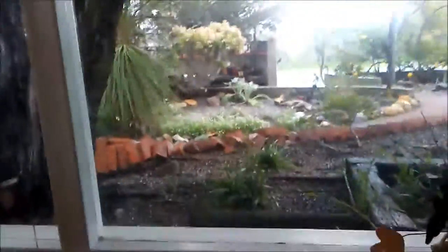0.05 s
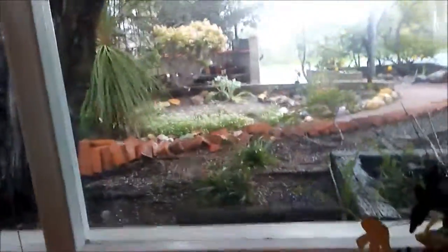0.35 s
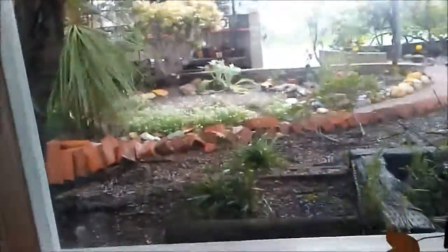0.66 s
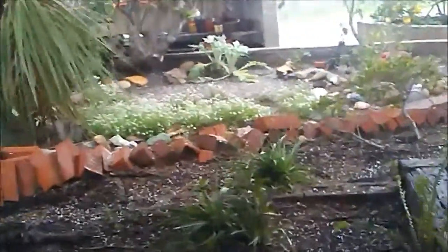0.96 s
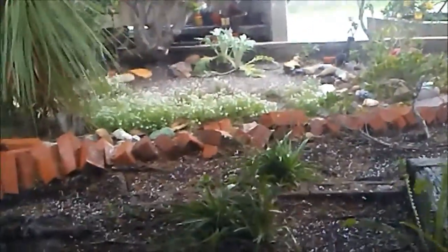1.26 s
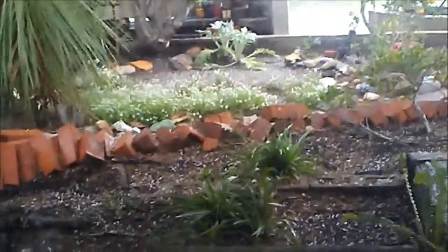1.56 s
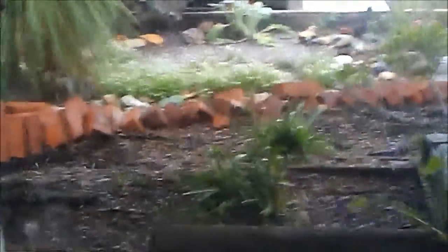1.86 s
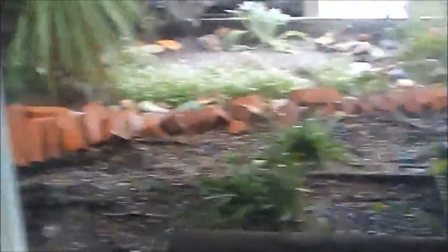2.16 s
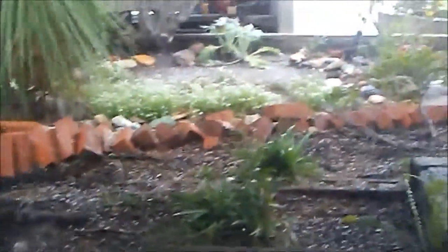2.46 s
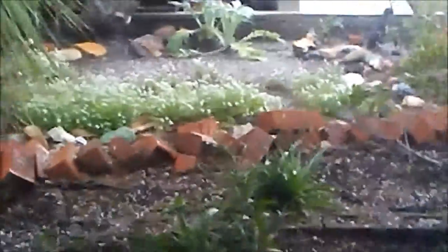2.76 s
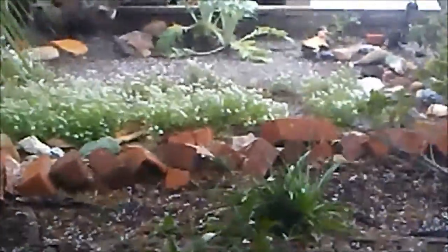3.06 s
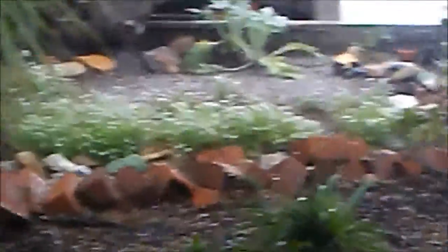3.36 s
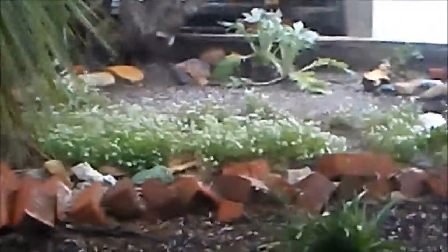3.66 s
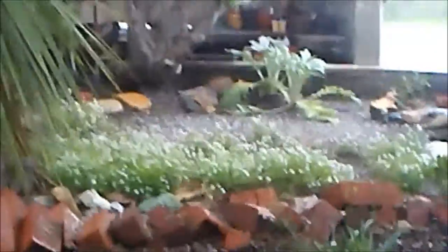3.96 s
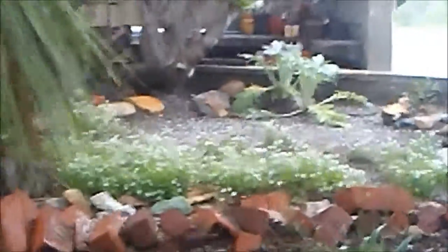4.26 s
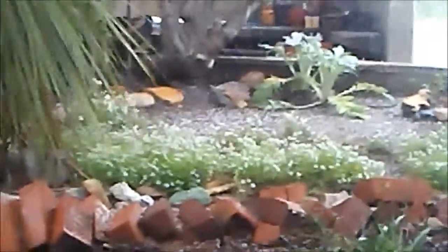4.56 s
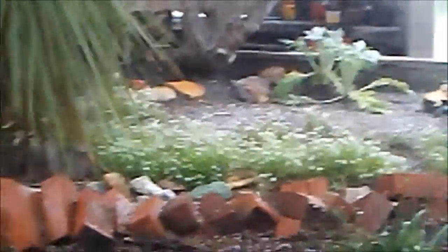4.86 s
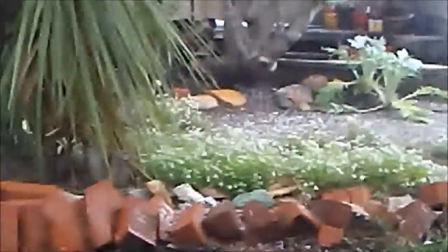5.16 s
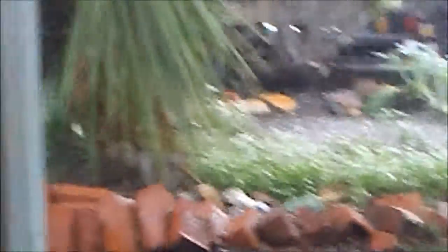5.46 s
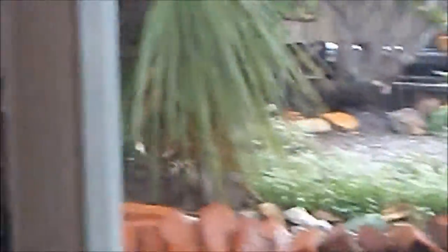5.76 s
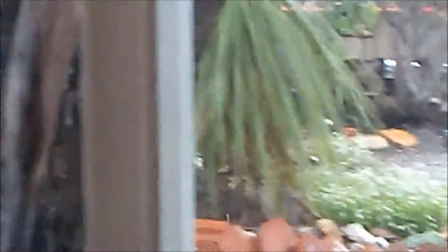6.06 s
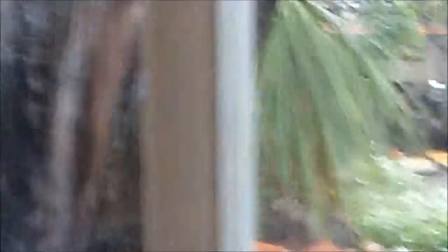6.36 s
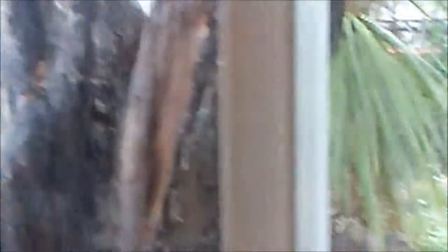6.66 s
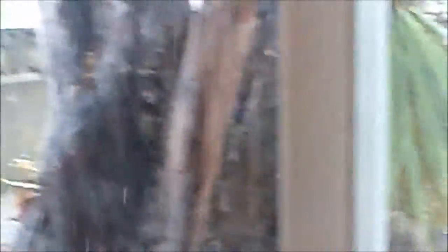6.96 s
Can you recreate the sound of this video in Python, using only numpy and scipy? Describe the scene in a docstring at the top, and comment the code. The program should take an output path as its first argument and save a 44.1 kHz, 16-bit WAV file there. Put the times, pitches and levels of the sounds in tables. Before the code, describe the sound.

A dense, crisp crackle of tiny ice pellets fills a yard throughout, swelling and easing irregularly. Close pellets snap on hard ground and bounce among loose stones, while others tap on leaves or briefly rattle a board. Farther landings merge into faint pattering and low drumming. The sound is bright and close, and gets a little fuller as the microphone turns from the open yard toward a door post.

```python
"""Ice pellets fall in a yard, heard from a doorway. The nearest crack on landing and skitter away,
and large ones rattle a leaf, board or stone. Close by, countless grains tick on hard ground, crunch
into gravel and patter on leaves, in uneven flurries over the low wash of the farther fall.
The microphone turns from the open yard toward the door post; it rings near 11 kHz and just overloads."""
import sys
import numpy as np
from scipy import signal
from scipy.fft import rfft, irfft
from scipy.io import wavfile

SR = 44100
rng = np.random.default_rng(int(sys.argv[2]) if len(sys.argv) > 2 else 0)


def master(y):
    """Save y as 16-bit WAV."""
    cut = np.clip(np.atleast_2d(y).T, -1, 1)
    pcm = np.round(cut * 32767)  # scale
    wavfile.write(sys.argv[1], SR, pcm.astype(np.int16))


N = 313639
TIME = np.arange(N) / SR
BINS = np.fft.rfftfreq(4096, 1 / SR)

# how far the microphone is turned from the open yard toward the door post: (t/s, share 0-1)
MIC_TURN = [(0, 0.3), (.25, 0.6), (.45, 0), (4.1, 0.3), (4.6, 0.48), (5.6, 0.97), (7.11, 0.93)]
# colour of a pellet cracking close to the microphone: (f/Hz, level/dB)
CRACK_COLOUR = [(2000, -68), (6000, -9.5), (8700, -13), (10000, -8.5), (11300, 1), (12200, 1.5),
                (14000, 0.5), (15800, -4.5)]
# colour of a landing in gravel: (f/Hz, level/dB)
GRAVEL_COLOUR = [(500, -20), (1500, -6.5), (2500, -4), (3200, -5.5), (3900, 0), (4700, 3), (5300, -3.5),
                 (5900, -1.5), (6500, -4.5), (7050, -2), (7700, -6.5), (8700, -13), (12000, 12),
                 (16000, -44)]


def gain_of(db):
    """Decibels to amplitude."""
    return 10 ** (np.asarray(db) / 20)


def unit_rms(x):
    """Scales to an rms of one."""
    return x / np.sqrt(np.mean(x ** 2) + 1e-20)


def curve(rows, column=1):
    """One column of a time table, at every sample."""
    rows = np.array(rows)
    return np.interp(TIME, rows[:, 0], rows[:, column])


def spectrum(points):
    """A colour table, in dB at every filter bin."""
    hz, db = np.transpose(points)
    return np.interp(np.log(BINS + 1), np.log(hz), db)


def bump(hz, width_hz, db):
    """One resonance, in dB at every filter bin."""
    return db / (1 + (2 * (BINS - hz) / width_hz) ** 2)


def colour(x, db):
    """Minimum-phase filter, so that clicks keep their sharp fronts."""
    log_gain = np.log(gain_of(np.r_[db, db[-2:0:-1]]))
    impulse = np.fft.ifft(np.exp(np.conj(signal.hilbert(log_gain)))).real
    return signal.oaconvolve(x, impulse)[:len(x)]


def add(mix, start_s, sound):
    """Mixes a sound in at a time."""
    part = mix[max(round(start_s * SR), 0):][:len(sound)]
    part += sound[:len(part)]


def ring(x, hz, width_hz):
    """A damped resonance; the result has energy one."""
    pole = np.exp((2j * hz - width_hz) * np.pi / SR)
    rung = signal.lfilter([1], [1, -pole], x).real
    return rung / (np.linalg.norm(rung) + 1e-12)


def burst(t60, density=0.91, rise_s=0):
    """A dying cluster of tiny contacts, of energy one."""
    t = TIME[1:16001]
    envelope = gain_of(-60 * t / t60) * (1 - np.exp(-t / (rise_s + 1 / SR)))
    contacts = rng.standard_normal(len(t)) * (rng.random(len(t)) < density) * envelope
    return contacts[:int(t60 * SR) + 8] / (np.linalg.norm(contacts) + 1e-12)


def shower(per_s, spread_db, band_hz, width_hz, tail_db, tail_t60, spots=56):
    """Pellets land at random on many spots, each with its own pitch and trail of bounces and echoes."""
    hits = gain_of(spread_db * np.minimum(rng.exponential(1, N), 3.5)) * rng.choice([-1, 1], N)
    hits *= rng.random(N) < per_s / SR
    spot = rng.integers(0, spots, N)
    out = np.zeros(N)
    for k, hz in enumerate(np.linspace(*band_hz, spots)):
        landing = gain_of(tail_db) * burst(tail_t60, density=0.15)
        landing[0] += 1  # the first contact
        out += signal.oaconvolve(hits * (spot == k), ring(landing, hz, width_hz))[:N]
    return out


def fall_db(surface, clump_db, clump_hz, attack_s=0.014, sag_db_per_s=7.5, release_db_per_s=129):
    """Strength of the fall on one surface: flurries start fast, sag and die; pellets clump by chance."""
    # the steady fall between flurries: (t/s, hard ground level/dB, gravel level/dB, leaves level/dB)
    steady_fall = [(0, -10, -22.5, -26), (.55, -25.5, -27.5, -28.5), (.8, -25, -27, -24),
                   (1.04, -29, -27, -29), (1.5, -24, -23.5, -24.5), (1.92, -28.5, -26, -26.5),
                   (2.55, -27, -25.5, -27), (3.4, -26.5, -25.5, -32.5), (4.02, -25, -30.5, -34),
                   (4.42, -24, -32, -37), (4.62, -16, -22.5, -25), (5.3, -17, -23, -29),
                   (5.65, -17, -29, -31.5), (5.85, -16, -21, -27), (6.25, -15, -22, -32),
                   (6.75, -21.5, -25, -25), (7.02, -16, -27, -37)]
    # handfuls that land together: (t/s, length/s, hard ground level/dB, gravel level/dB, leaves level/dB)
    flurries = [(0, 0.23, -19, -33, -27), (0.355, 0.046, -22, -20, -21.5), (0.624, 0.2, -19, -25, -40),
                (.9, 0.048, -18.5, -23, -27), (1.114, 0.1, -22.5, -22.5, -22),
                (1.288, 0.11, -18, -22.5, -23), (1.484, 0.18, -22, -27, -26.5),
                (1.66, 0.058, -24, -24.5, -20), (1.813, 0.026, -26, -21.5, -26),
                (1.944, 0.079, -14, -17, -22.5), (2.111, .25, -16, -20.5, -22),
                (2.663, 0.071, -22.5, -24.5, -23.5), (2.768, 0.09, -18, -18, -22),
                (2.905, 0.057, -39, -24.5, -27), (3.108, 0.13, -23, -21.5, -26.5),
                (3.404, 0.055, -29, -24, -27.5), (3.564, 0.19, -17, -20, -25.5),
                (3.867, 0.061, -21.5, -24.5, -29.5), (4.063, 0.1, -23, -27.5, -26),
                (4.202, 0.12, -15, -20.5, -24), (4.402, 0.043, -22, -24.5, -24),
                (4.488, 0.11, -22, -21, -36), (4.663, .1, -16.5, -18.5, -24.5),
                (4.832, 0.23, -36, -22, -25), (5.089, 0.15, -18.5, -19, -23.5),
                (5.348, 0.13, -14.5, -17, -22.5), (5.539, 0.017, -23, -21, -27),
                (5.696, 0.18, -23, -24, -37), (5.922, 0.092, -15, -20, -27),
                (6.175, .15, -22, -22.5, -25.5), (6.465, 0.14, -17.5, -28, -43),
                (6.684, 0.13, -22, -24.5, -39), (6.866, 0.062, -18.5, -21.5, -28),
                (7.046, 0.078, -20, -22, -25)]
    which = ["hard ground", "gravel", "leaves"].index(surface)
    power = gain_of(curve(steady_fall, column=which + 1)) ** 2
    t = TIME[:SR]
    for start_s, length_s, *surface_db in flurries:
        db = surface_db[which] - sag_db_per_s * t - release_db_per_s * np.maximum(t - length_s, 0)
        add(power, start_s, (np.minimum(t / attack_s, 1) * gain_of(db)) ** 2)
    rolloff = 1 + (np.fft.rfftfreq(N, 1 / SR) / clump_hz) ** 4
    clumps = irfft(rfft(rng.standard_normal(N)) / rolloff, N)
    return 10 * np.log10(power) + clump_db * unit_rms(clumps)


def far_fall(flurry_share=0.73):
    """Distant landings merge into a patter and a low drumming, both louder toward the door post."""
    # resonances of the doorway around the microphone: (f/Hz, width/Hz, level/dB)
    doorway_modes = [(126.5, 29, 5), (235, 18, 6), (350, 13, 9), (760, 70, 4), (1064, 24, 2.5)]
    # colour of the distant patter: (f/Hz, level/dB)
    patter_colour = [(200, -18.5), (400, -5.5), (480, -5), (650, -1.5), (900, -0.5), (1130, -5.5),
                     (1500, 3.5), (2200, -24.5)]
    # colour of the low drumming: (f/Hz, level/dB)
    drumming_colour = [(25, -29), (42, -13), (57, -6.5), (100, -4.5), (135, -1.5), (210, 0.5), (300, 0.5),
                       (400, -3.5), (520, -17.5), (900, -21)]
    doorway_db = sum(bump(*mode) for mode in doorway_modes)
    patter = shower(per_s=800, spread_db=3.5, band_hz=(360, 1690), width_hz=53,
                    tail_db=1.5, tail_t60=0.18)
    patter = unit_rms(colour(patter, spectrum(patter_colour) + doorway_db))
    drumming = shower(per_s=450, spread_db=3.5, band_hz=(30, 531), width_hz=41,
                      tail_db=0.5, tail_t60=0.12)
    drumming = unit_rms(colour(drumming, spectrum(drumming_colour) + doorway_db))
    swell_db = fall_db("gravel", clump_db=0.36, clump_hz=13)
    turn = curve(MIC_TURN)
    patter_db = -39.5 + 4.5 * turn + flurry_share * (swell_db - swell_db.mean())
    return patter * gain_of(patter_db) + drumming * gain_of(-44.5 + 3.7 * turn)


def leaves():
    """Stiff leaves near the door answer each pellet with a short papery tap."""
    # colour of a landing on leaves: (f/Hz, level/dB)
    leaf_colour = [(400, -29.5), (1000, -4), (1330, -24), (1460, -5), (1580, -7.5), (1720, 1.5),
                   (1830, -0.5), (2080, 3), (2380, 1.5), (2700, -10), (3300, -12.5), (6000, -40)]
    taps = shower(per_s=1000, spread_db=3, band_hz=(1049, 3135), width_hz=92, tail_db=1, tail_t60=0.18)
    level_db = fall_db("leaves", clump_db=1.5, clump_hz=8.7) - 3
    return unit_rms(colour(taps, spectrum(leaf_colour))) * gain_of(level_db)


def gravel():
    """Pellets clatter densely among loose stones close by."""
    grains = shower(per_s=1100, spread_db=3, band_hz=(1965, 8840), width_hz=530,
                    tail_db=11, tail_t60=0.15, spots=64)
    level_db = fall_db("gravel", clump_db=0.84, clump_hz=35.2) - 1.12
    return unit_rms(colour(grains, spectrum(GRAVEL_COLOUR))) * gain_of(level_db)


def hard_ground():
    """Fine ticks on brick and stone merge into a sizzle; a few closer ones stand out crisp and bright."""
    # colour of a landing on brick and stone: (f/Hz, level/dB)
    ground_colour = [(3000, -39), (6000, -17), (7200, -13), (8700, -14), (10000, -5.5), (10800, -3.5),
                     (12000, 3), (13000, -3), (14000, -1.5), (15800, -3)]
    fine = shower(per_s=1500, spread_db=2.5, band_hz=(6000, 15900), width_hz=3500,
                  tail_db=7, tail_t60=0.044)
    sizzle = unit_rms(colour(fine, spectrum(ground_colour) + bump(hz=10760, width_hz=1200, db=3)))
    close = shower(per_s=100, spread_db=2.6, band_hz=(10000, 15500), width_hz=5000,
                   tail_db=14, tail_t60=0.008)
    crisp = gain_of(-7.5) * unit_rms(colour(close, spectrum(CRACK_COLOUR)))
    return (sizzle + crisp) * gain_of(fall_db("hard ground", clump_db=1.3, clump_hz=40) - 3)


def hollow_taps():
    """Large pellets rattle one leaf, board or stone at its own pitch."""
    # single large pellets around the yard: (t/s, relative level/dB, f/Hz)
    taps = [(.373, -8, 1810), (.378, -0.5, 4700), (1.065, -6, 2160), (1.309, -2.5, 4560), (1.754, -1, 2180),
            (1.96, -10, 1150), (1.972, -1, 2020), (2.167, -9, 2430), (2.399, -5, 2050), (2.84, 1, 4730),
            (2.888, -4.5, 2050), (3.135, -1, 4600), (3.738, -4.5, 5040), (3.922, -11, 1520),
            (4.23, -16, 795), (4.285, -4, 2120), (4.02, -20, 207), (4.631, -17, 150), (4.76, -12.5, 216),
            (4.918, -4, 2400), (4.92, -17, 730), (4.991, -12, 1260), (5.13, -16, 163), (5.37, -30, 780),
            (5.86, -9, 1570), (5.97, -5, 2100), (5.98, -11.5, 228), (6.029, -7, 5000), (6.08, -1.5, 5400),
            (6.185, -10, 2250), (6.236, 1, 13700), (6.68, -15, 760)]
    out = np.zeros(N)
    for start_s, db, hz in taps:
        rattle = ring(burst(t60=0.21), hz, width_hz=45 + 0.089 * hz)
        add(out, start_s, gain_of(db + 11) * rattle)
    return out


def near_pellets():
    """Each cracks on landing, then its bits skitter away and stir the gravel in proportion."""
    # loudest landings by the microphone: (t/s, relative crack level/dB, skitter level/dB re the crack)
    landings = [(.061, .5, -5), (0.13, -11, -3), (0.181, 4.5, 5.5), (.328, -2, 3), (0.769, 3.5, 6),
                (0.7892, -1, -1), (1.083, -2.5, 10), (1.254, -4, 5.5), (1.417, 2, 1), (1.431, 2.5, 2.5),
                (1.5084, 2, -3), (1.552, 5.5, -9), (1.963, 0, -2), (2.0792, 5, -2), (2.15, 0, -17),
                (2.41, 2.5, 2), (2.5726, 0.5, 3), (2.579, 0, 3.5), (2.7501, 3, 5), (2.782, 2, -1),
                (2.8739, 1, -2), (3.0762, 0, 5.5), (3.176, 2, -1), (3.3288, -3, 1), (3.4153, -1, -2),
                (3.5297, -0.5, 3.5), (3.6588, 5, 4.5), (3.74, 3, 5), (4.2256, -3, -32), (4.244, -14, 11),
                (4.4987, 1, 11.5), (4.564, 1.5, 6), (4.745, 5, -16), (4.9828, -1, 9.5), (5.0755, -4, 9),
                (5.2152, 1.5, 5.5), (5.378, 4, -4), (5.637, 5.5, 0.5), (5.8532, 1, 0), (5.918, 3.5, 6.5),
                (6.158, 3.5, 4.5), (6.304, 3, 3), (6.422, 2.5, 4), (6.4587, 6, 4.5), (6.746, 1, -2),
                (6.78, 3.5, 7), (6.9395, 2, 3), (7.002, -5, 6)]
    ice, stones = np.zeros((2, N))
    for start_s, crack_db, skitter_db in landings:
        crack = burst(t60=0.011, rise_s=0.0004)
        bounces = burst(t60=0.15, density=0.045, rise_s=0.002)
        skitter = signal.fftconvolve(bounces, burst(t60=0.004))
        crunch = burst(t60=0.29, rise_s=0.0045)
        add(ice, start_s, gain_of(crack_db) * crack)
        add(ice, start_s, gain_of(crack_db + skitter_db) * skitter)
        add(stones, start_s, gain_of(crack_db + skitter_db) * crunch)
    ice = gain_of(12.5) * colour(ice, spectrum(CRACK_COLOUR))
    return ice + gain_of(2) * colour(stones, spectrum(GRAVEL_COLOUR))


def scene():
    """The whole yard from the doorway, its colour shifting as the microphone turns."""
    # colour added with the microphone facing the door post: (f/Hz, level/dB)
    post_colour = [(100, 1), (750, 0), (1400, 0), (2050, -1.5), (2480, 1), (3200, -1), (4700, -3),
                   (5400, 4), (5800, -3.5), (6250, 4), (8500, 0), (9900, 2), (10800, 5), (11800, -0.5),
                   (15800, -4)]
    yard = hard_ground() + gravel() + leaves() + far_fall() + hollow_taps() + near_pellets()
    turn = curve(MIC_TURN)
    return ((1 - turn) * yard + turn * colour(yard, spectrum(post_colour)))[None]


def record(dry, clip_level=0.92, band_limit_hz=15850):
    """One microphone: its port rings, the loudest cracks clip, and the top treble is cut off."""
    port_db = bump(hz=11000, width_hz=950, db=5)
    clipped = np.clip(colour(dry[0], port_db), -clip_level, clip_level)
    lowpass = signal.firwin(511, band_limit_hz, window=("kaiser", 9), fs=SR)
    return signal.oaconvolve(clipped, lowpass, "same")[None]


dry = scene()
out = record(dry)
master(out)
```